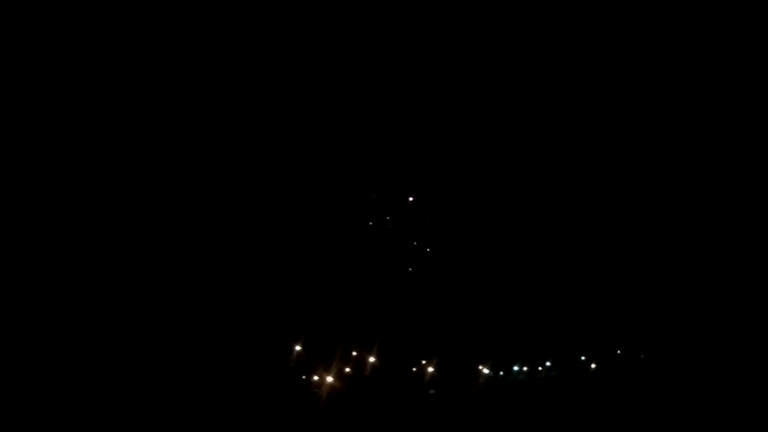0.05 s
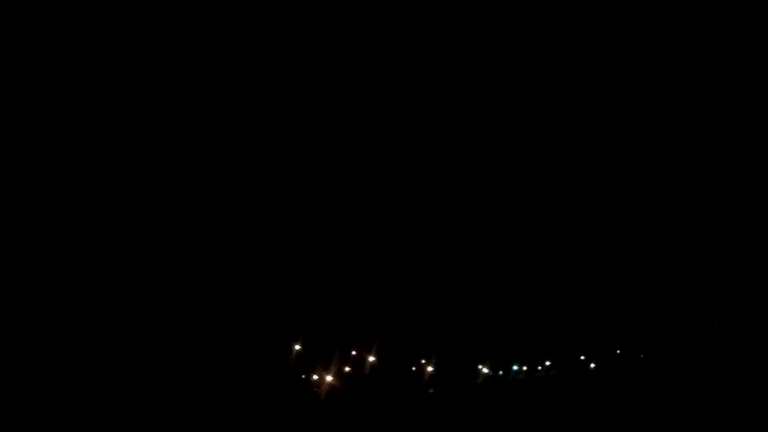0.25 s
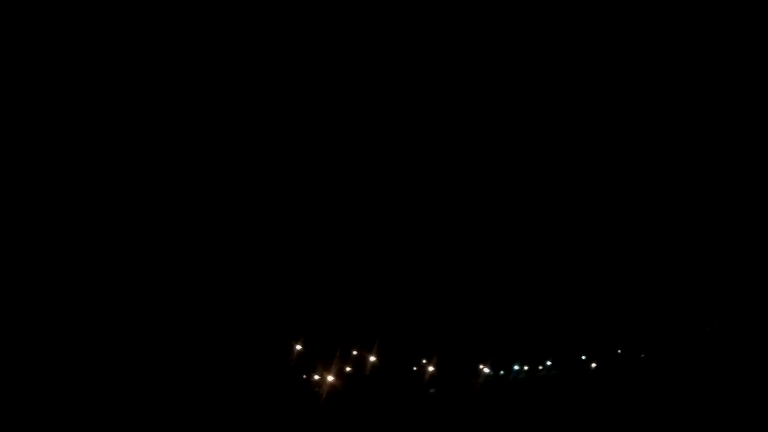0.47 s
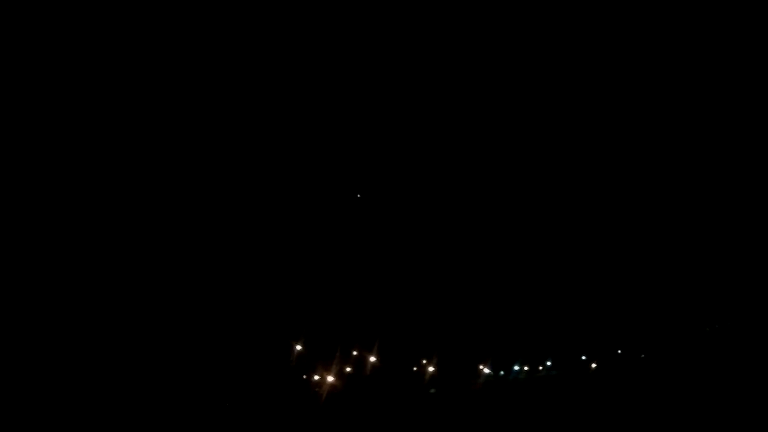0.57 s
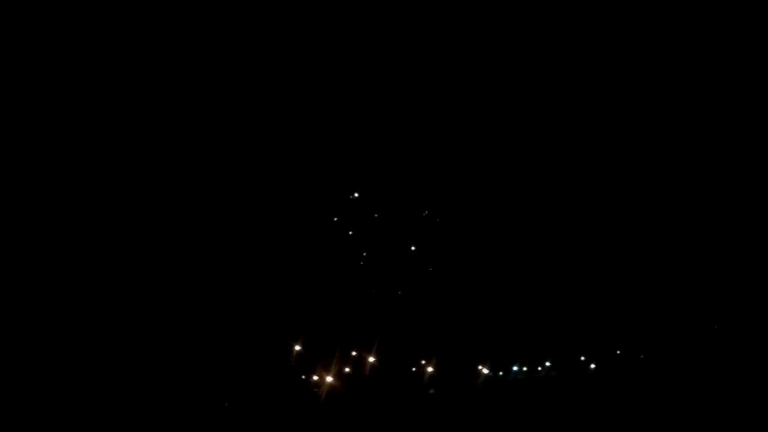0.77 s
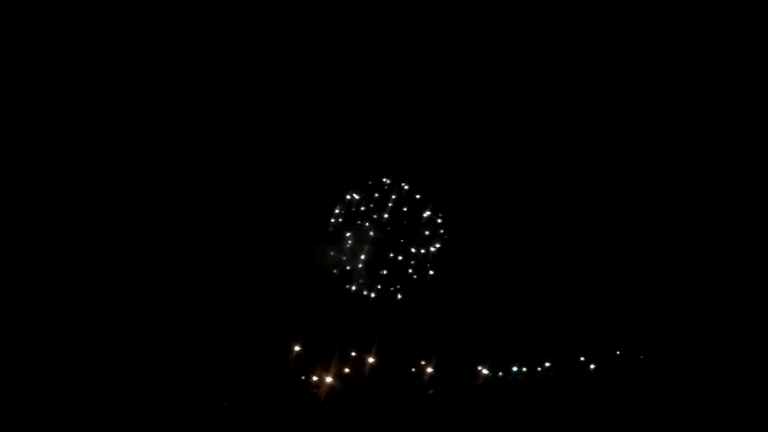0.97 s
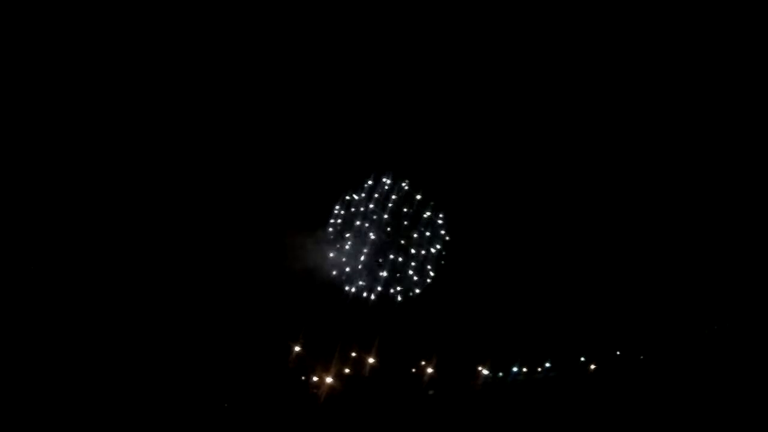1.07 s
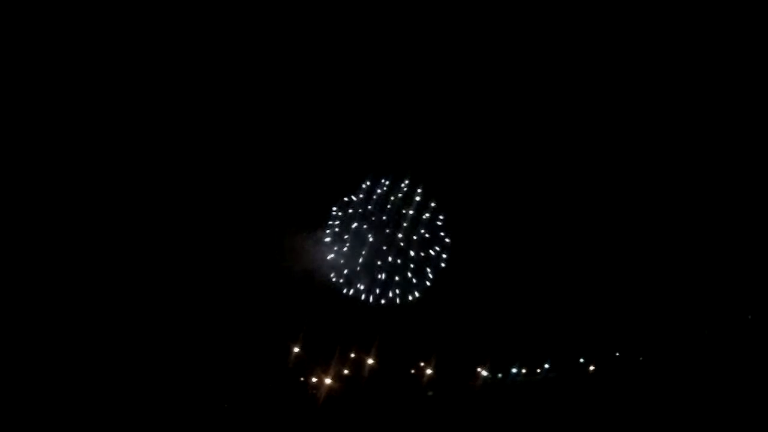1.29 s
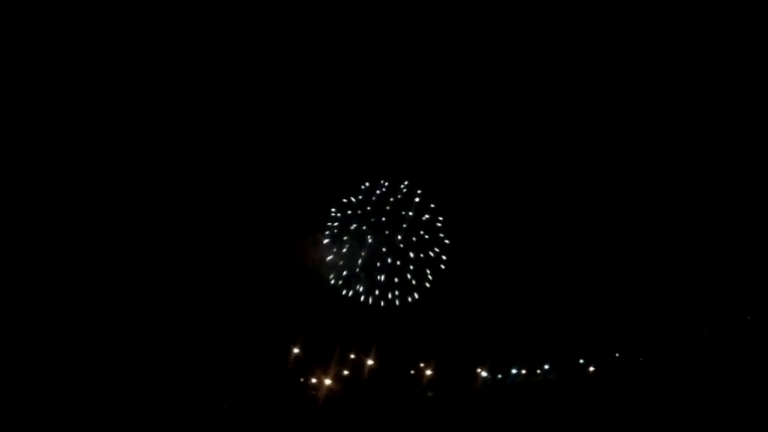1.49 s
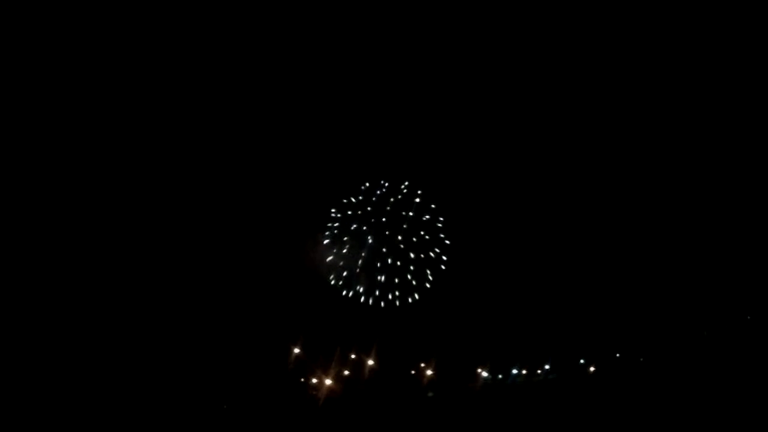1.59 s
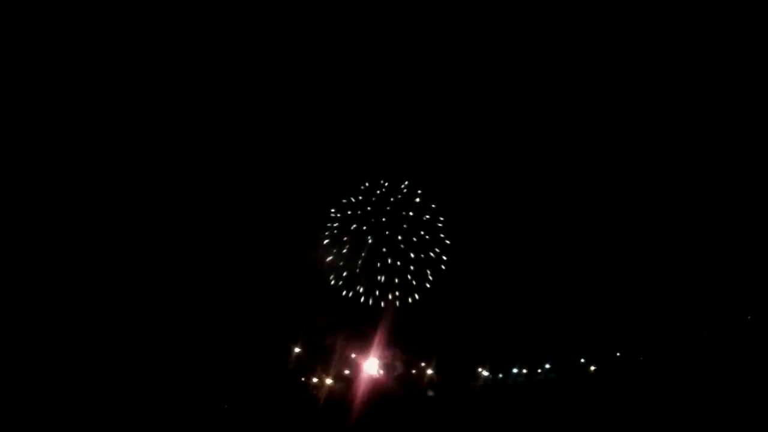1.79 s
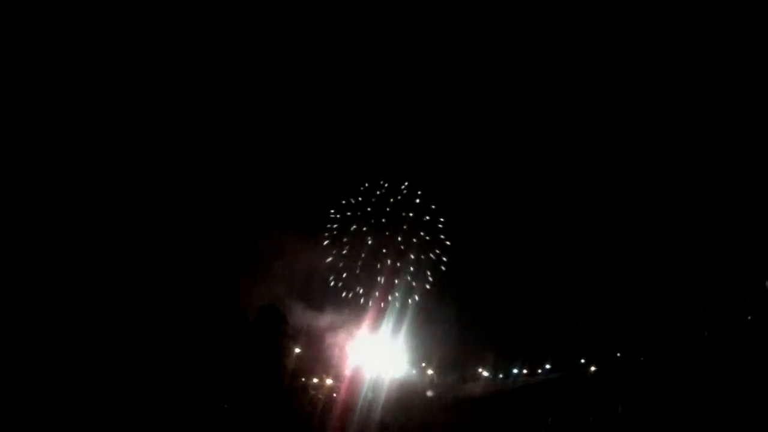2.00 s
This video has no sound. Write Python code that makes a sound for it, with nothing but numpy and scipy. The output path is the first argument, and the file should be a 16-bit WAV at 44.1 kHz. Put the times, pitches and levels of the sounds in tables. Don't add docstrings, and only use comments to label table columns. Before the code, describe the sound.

A firework shell bursts with one sharp, deep-bodied crack over quiet hum and faint hiss; wall slaps and shore echoes follow, rolling duller as they fade, with soft thuds and a brief bird squeal, on a small mono camera microphone.

```python
import sys
import numpy as np
from scipy import signal
from scipy.fft import rfft, irfft, next_fast_len
from scipy.io import wavfile
from scipy.ndimage import uniform_filter1d, map_coordinates

SR = 44100
rng = np.random.default_rng(int(sys.argv[2]) if len(sys.argv) > 2 else 0)


def invert_db(x):
    u = np.asarray(x, float) / 20
    return 10 ** u


def waveform_to_disk(signal):
    frames = np.transpose(np.atleast_2d(signal))
    scaled = np.clip(frames, -1, 1) * 32767
    samples = np.round(scaled).astype(np.int16)
    wavfile.write(sys.argv[1], SR, samples)


N = 90404

BLAST_STARTS = [
    .20890,
    .20922,
    .21190,
]
# freq_hz, level_db (per Hz)
ROLL_SPECTRUM = [(18, -20), (30, -5), (107, 10.5), (384, 0), (511, -3.5), (1090, 0.5), (2030, -6),
                 (2920, -6), (15000, -49)]
PATCHY_DB = 0.8


def unit(x):
    return x / np.sqrt(np.mean(x ** 2) + 1e-20)


def along(points, hz):
    f, v = np.transpose(points)
    return np.interp(np.log(hz + 1), np.log(f + 1), v)


def filtered(x, response):
    m = next_fast_len(N + SR // 2)
    return irfft(rfft(x, m) * response(np.fft.rfftfreq(m, 1 / SR)), m)[:N]


def wobble(rate):
    knots = rng.standard_normal(int(N * rate / SR) + 4)
    return map_coordinates(knots, [np.arange(N) * rate / SR])


def rush(spectrum, patchy_db, shape=lambda hz, t: 1):
    noise = filtered(rng.standard_normal(N), lambda f: invert_db(along(spectrum, f)))
    hz, t, z = signal.stft(noise, SR, nperseg=512)
    patches = uniform_filter1d(rng.standard_normal(z.shape), 5, 0)
    patches = uniform_filter1d(patches, 6, 1)
    z = z * invert_db(patchy_db * unit(patches))
    level = np.std(signal.istft(z, SR, nperseg=512)[1])
    return signal.istft(z * shape(hz[:, None], t), SR, nperseg=512)[1][:N] / level


def ripple(f):
    # center_hz, width_hz, gain_db
    mic_peaks = [(2153, 118, -7.5), (2584, 1050, 3.5), (3870, 490, 4.5), (4220, 200, -3.5),
                 (4850, 230, 6.5), (6050, 680, 5.5)]
    return invert_db(sum(db * np.exp(-((f - c) / w) ** 2) for c, w, db in mic_peaks))


def hiss():
    # freq_hz, level_db (per Hz)
    hiss_spectrum = [(25, -39), (1000, -25), (4000, -1), (8000, 2), (13000, -5), (15500, -8)]
    return invert_db(-75) * rush(hiss_spectrum, patchy_db=0.3)


def town():
    # freq_hz, level_db (per Hz)
    town_spectrum = [(15, -29), (25, 3), (144, -0.5), (233, 0), (331, -11.5), (410, -5.5), (495, -6),
                     (2920, -18.5), (15500, -41.5)]
    return invert_db(-60) * rush(town_spectrum, PATCHY_DB, shape=lambda hz, t: ripple(hz))


def bird():
    # start_s, pitch_hz, level_db
    squeal_glide = [
        (1.104, 1950, -47),
        (1.134, 2270, -49),
        (1.174, 2110, -54),
        (1.197, 1910, -46),
        (1.258, 1845, -46.5),
        (1.278, 1915, -41),
        (1.304, 1951, -42.5),
        (1.326, 2310, -45.5),
        (1.359, 2224, -47),
    ]
    # start_s, rate_hz, depth_db
    voice_split = [
        (1.19, 550, -46),
        (1.215, 539.5, -19),
        (1.256, 328, -5),
        (1.292, 247, -10),
        (1.32, 195, -16.5),
        (1.345, 100, -14),
    ]
    t = np.arange(N) / SR
    s, hz, db = np.transpose(squeal_glide)
    s2, rate, depth_db = np.transpose(voice_split)
    phase = 2 * np.pi * np.cumsum(np.interp(t, s, hz) * (1 + 0.0028 * wobble(120))) / SR
    beat = 2 * np.pi * np.cumsum(np.interp(t, s2, rate)) / SR

    upper = np.sin(phase + beat)
    lower = invert_db(-10) * np.sin(phase - beat)
    second_upper = invert_db(-9) * np.sin(phase + 2 * beat)
    side_tones = invert_db(np.interp(t, s2, depth_db)) * (upper + lower + second_upper)
    voice = np.sin(phase) + side_tones + invert_db(-36) * np.sin(3 * phase)

    flutter_db = 4 * (t > 1.305) * np.cos(2 * np.pi * (t - 1.341) / 0.0196)
    loudness = invert_db(np.interp(t, s, db) + 0.5 + 1.8 * wobble(90) + flutter_db)
    edge = np.clip(np.minimum(t - s[0], s[-1] - t) / 0.0036, 0, 1)
    call = edge * loudness * voice

    tail = rng.standard_normal(SR // 2) * invert_db(-60 * t[:SR // 2] / 0.67)
    echo = signal.fftconvolve(call, tail / np.linalg.norm(tail))[:N]
    return call + invert_db(-9.5) * echo


def thuds():
    # start_s, peak_db, pitch_hz, t60_s
    low_pushes = [
        (0.616, -27.5, 51, 0.071),
        (.760, -40, 51.7, 0.066),
        (0.936, -37, 100, 0.054),
        (1.155, -41.5, 55, 0.043),
        (2.004, -42.5, 183, 0.041),
    ]
    t = np.arange(N) / SR
    low = np.zeros(N)
    for s, db, hz, t60 in low_pushes:
        fade = invert_db(db - 60 * abs(t - s) / t60)
        low += fade * (t > s) * np.sin(2 * np.pi * hz * (t - s))
    tick_start_s, tick_hz, tick_length_s = 2.0125, 2280, 0.005
    tick = filtered(rng.standard_normal(N), lambda f: 1 / (1 + ((f - tick_hz) / 160) ** 2))
    return low + invert_db(-50) * np.exp(-((t - tick_start_s) / tick_length_s) ** 2) * unit(tick)


def scattered_roll():
    # freq_hz, t60_s
    early_decay = [(40, 1.1), (150, 1.07), (300, 0.51), (1000, 0.49), (3000, 1.28), (6000, 0.91),
                   (14000, .4)]
    # freq_hz, t60_s
    late_decay = [(40, 9.1), (150, 5.3), (500, 5.1), (2500, 5.4), (5000, 3.77), (14000, 1.3)]

    def decay(hz, t, t60):
        return invert_db(-60 * np.maximum(t - BLAST_STARTS[0], 0) / along(t60, hz))

    def fade(hz, t):
        return ripple(hz) * (decay(hz, t, early_decay) + invert_db(-5.5) * decay(hz, t, late_decay))

    t = np.arange(N) / SR
    sway_db = 0.6 * (wobble(11.24) + wobble(60.35))
    onset = np.clip((t - BLAST_STARTS[0]) / 0.006, 0, 1)
    return invert_db(-37.5 + sway_db) * rush(ROLL_SPECTRUM, PATCHY_DB, fade) * onset


def shores():
    # start_s, level_db, hold_s, fall_t60_s, center_hz (of the bell, before the top cut)
    shore_echoes = [
        (0.335, -36, 0.0081, 0.47, 2780),
        (0.348, -44, 0.09, 0.21, 244),
        (0.6212, -40, 0.021, 0.18, 1320),
        (0.629, -44, 0.024, 0.22, 2400),
        (0.886, -53, 0.066, 0.56, 2670),
        (0.927, -48, 0.028, 0.092, 1030),
        (1.162, -53.5, 0.014, 0.077, 180),
        (1.419, -55, 0.041, 0.24, 560),
        (0.216, -61.5, 0.13, 0.62, 10500),
    ]
    shore_widths = [0.88, 1.1, 0.78, 0.6, 0.22, 1.04, 1.14, 1.45, 1.7]
    rise_s, top_hz = 0.002, 4200
    t, out = np.arange(N) / SR, np.zeros(N)
    for (s, db, hold, fall, hz), octaves in zip(shore_echoes, shore_widths):
        rise = np.exp(-((t - s) / rise_s) ** 2)
        swell = np.where(t < s, rise, invert_db(-60 * np.maximum(t - s - hold, 0) / fall))

        def shore_response(f):
            bell = np.exp(-(np.log2((f + 1) / hz) / octaves) ** 2)
            return ripple(f) * bell / (1 + (f / top_hz) ** 2)

        band = filtered(rng.standard_normal(N), shore_response)
        out += invert_db(db + 1.35 * wobble(120)) * swell * unit(band)
    return out


def body(f):
    # center_hz, width_hz, level_db
    resonances = [(100, 124, 24), (253.4, 104, 29), (733, 195, 20.5), (1050, 120, 25.5), (1528, 130, 19),
                  (2630, 680, 15.5), (3350, 570, 8.5), (4500, 300, 4.5), (8900, 2800, -21)]
    air_hz, low_hz = 6700, 68.5
    rings = -sum(invert_db(db) * 1j * f * w / (c * c - f * f + 1j * f * w) for c, w, db in resonances)
    return rings / (1 + 1j * f / air_hz) ** 5 * (1j * f / (low_hz + 1j * f))


def slaps():
    slap_starts = [.2235, .2320, .3092, .3352, .3375, .3480, .4080]
    # level_db, smear_s, top_hz
    wall_faces = [
        (-4, 0.00075, 7700),
        (-9.5, 0.0018, 450),
        (-6.5, 0.0011, 7200),
        (-3.5, 0.0003, 7900),
        (-6, 0.004, 1240),
        (-8, 0.0026, 7000),
        (-17, 0.0011, 5200),
    ]
    out, t = np.zeros(N), np.arange(N) / SR
    for s, (db, smear, top_hz) in zip(slap_starts, wall_faces):
        face = (t > s) * np.exp(-abs(t - s) / smear) * rng.standard_normal(N)

        def wall_response(f):
            low_cut = 1j * f / (top_hz / 4 + 1j * f)
            return body(f) * (low_cut / (1 + 1j * f / top_hz)) ** 2

        out += invert_db(db) * filtered(face / np.linalg.norm(face), wall_response)
    return out


def blast():
    arrival_levels = [-8, 0, -9]

    def paths(f):
        arrivals = zip(BLAST_STARTS, arrival_levels)
        return body(f) * sum(invert_db(db) * np.exp(-2j * np.pi * f * s) for s, db in arrivals)

    t = np.arange(N) / SR - BLAST_STARTS[0]
    impulse = np.arange(N) == 0
    jump = filtered(impulse, paths)
    crack = rush(ROLL_SPECTRUM, patchy_db=-2.5, shape=lambda hz, u: ripple(hz) * hz / (hz + 900))
    crack_db, crack_t60_s = -8, 0.04
    crack_fade = invert_db(crack_db - 60 * abs(t) / crack_t60_s) * np.clip(t / 0.00096, 0, 1)
    return jump + crack_fade * crack


def scene():
    background = hiss() + town()
    echoes = scattered_roll() + shores() + slaps()
    return (background + bird() + thuds() + echoes + blast())[None]


def low_pass(x):
    return signal.sosfilt(signal.butter(12, 16500, fs=SR, output="sos"), x)


def record(dry):
    mix = filtered(dry[0], lambda f: np.where(f < 15300, 1, invert_db(-30)))[None]
    return low_pass(mix)


dry = scene()
out = record(dry)
waveform_to_disk(out)
```